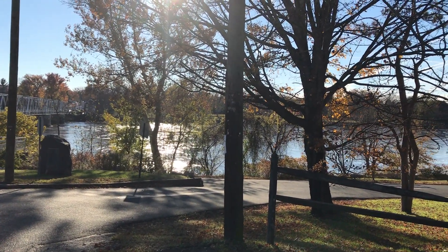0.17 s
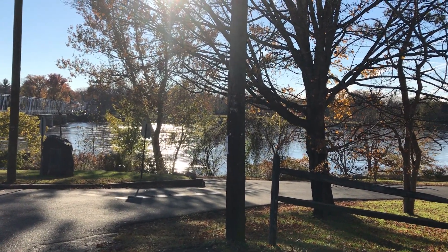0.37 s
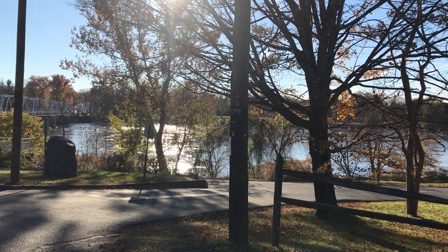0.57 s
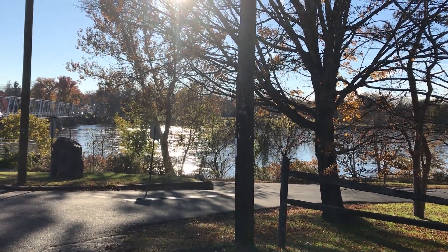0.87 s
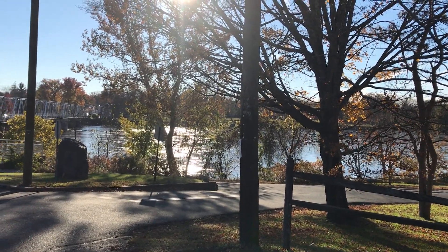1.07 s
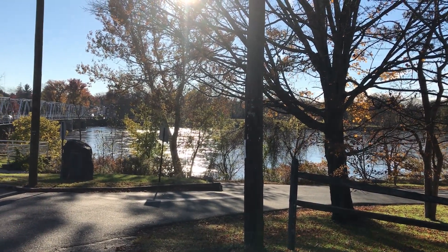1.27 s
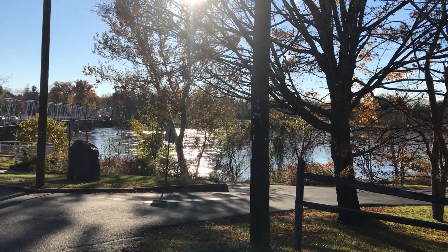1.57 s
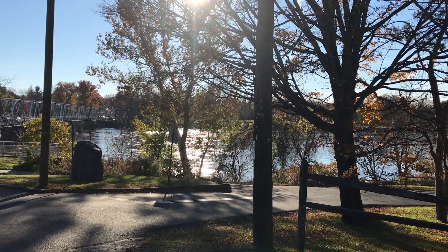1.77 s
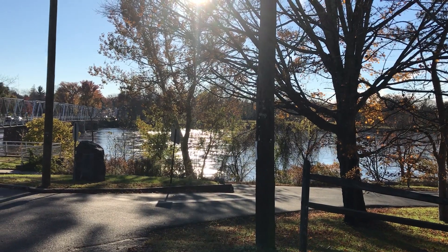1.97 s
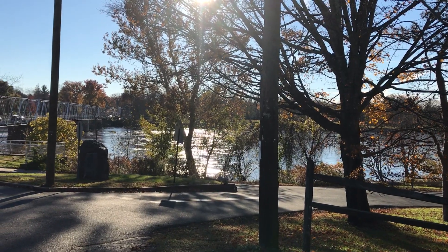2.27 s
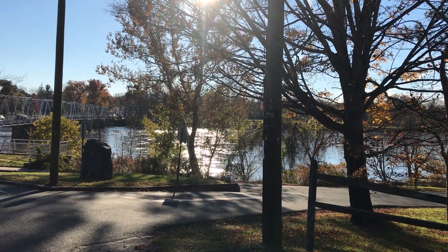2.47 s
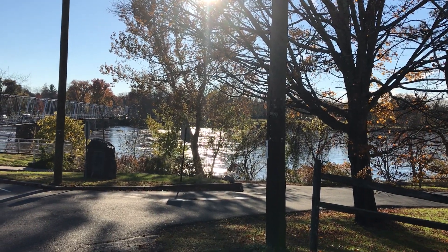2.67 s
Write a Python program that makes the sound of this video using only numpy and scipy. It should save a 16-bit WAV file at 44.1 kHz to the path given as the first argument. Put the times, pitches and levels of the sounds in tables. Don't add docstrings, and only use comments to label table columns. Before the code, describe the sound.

A big engine idles with lumpy, uneven low thumps outdoors while a car's tyre whoosh slowly swells

```python
import sys
import numpy as np
from scipy import signal
from scipy.fft import rfft, irfft
from scipy.io import wavfile
from scipy.ndimage import uniform_filter1d

SR = 44100
rng = np.random.default_rng(int(sys.argv[2]) if len(sys.argv) > 2 else 0)


def dump(signal):
    limited = np.clip(np.atleast_2d(signal).T, -1, 1)
    pcm = np.round(limited * 32767).astype(np.int16)
    wavfile.write(sys.argv[1], SR, pcm)


def ratio_of_db(decibels):
    return 10 ** (np.asarray(decibels, float) / 20)


N = 123921
T = np.arange(N) / SR
STEP_TAU = np.arange(SR // 8) / SR


def idle():
    # (time [s], level [dB])
    firings = [(0.004, -22.5), (0.146, -20.5), (0.224, -21.5), (0.286, -23), (0.361, -21), (0.5, -21.5),
               (0.572, -22.5), (0.644, -21), (0.716, -25), (0.791, -23.5), (0.866, -19.5), (0.938, -26.5),
               (1.008, -23.5), (1.083, -21), (1.293, -23), (1.365, -22), (1.439, -25.5), (1.51, -21.5),
               (1.585, -24.5), (1.742, -20.5), (1.813, -23), (1.877, -21.5), (1.947, -32), (2.096, -23),
               (2.167, -25.5), (2.242, -26.5), (2.318, -25), (2.535, -22), (2.605, -27.5), (2.756, -25.5)]
    idle_s, weak_db = 0.0725, -30
    lag_s, return_s, return_db = 0.004, 0.035, -9
    rows = list(firings)
    for (a, _), (b, _) in zip(firings, firings[1:]):
        count = int(round((b - a) / idle_s))
        rows += [(a + (b - a) * k / count, weak_db) for k in range(1, count)]
    out = np.zeros(N)
    for (at, db), luck in zip(rows, rng.standard_normal((len(rows), 8))):
        thump = exhaust_thump(luck)
        at += lag_s
        add(out, at, ratio_of_db(db) * thump)
        add(out, at + return_s * (1 + 0.08 * luck[1]), ratio_of_db(db + return_db + 2 * luck[2]) * thump)
    return out


def exhaust_thump(luck):
    # (frequency [Hz], T60 [s], level [dB])
    pipe = [(121.5, 0.03, -13), (206.6, 0.12, -9.5), (250.6, 0.18, -15), (292, 0.095, -10),
            (341.6, 0.071, -14)]
    start_hz, end_hz, sink_s = 274.7, 66.8, 0.0051
    thump_db, thump_t60_s, attack_s = 3, 0.25, 0.00247
    puff_db, puff_hz, puff_width_hz, puff_s = -22.5, 690, 715.0, 0.0075
    tau = np.arange(SR // 4) / SR
    turns = end_hz * (1 + 0.018 * luck[0]) * tau
    turns += (start_hz - end_hz) * sink_s * (1 - np.exp(-tau / sink_s))
    thump = -np.sin(2 * np.pi * turns) * ratio_of_db(thump_db - 60 * tau / thump_t60_s)
    for (hz, t60, db), chance in zip(pipe, luck[3:]):
        thump += ratio_of_db(db + 1.2 * chance) * ring(hz * (1 + 0.023 * chance), t60, tau)
    thump *= np.minimum(tau / attack_s, 1)
    puff_env = ratio_of_db(puff_db + 3.8 * luck[2]) * np.exp(-tau / puff_s)
    return thump + burst(puff_hz, puff_width_hz, puff_env)


def car_drone():
    # (time [s], pitch [Hz], level [dB])
    drone = [(1.6, 75.8, -32), (1.622, 75.76, -18.5), (1.748, 76.2, -27.5), (1.878, 92.14, -28),
             (2.0, 92.53, -30.5), (2.198, 82.97, -24.5), (2.364, 77.87, -23), (2.728, 77.5, -25),
             (2.81, 74.6, -21)]
    phase = 2 * np.pi * np.cumsum(curve(drone) * (1 + 0.0051 * walk(7.76))) / SR
    fade = np.clip((T - drone[0][0]) / 0.14, 0, 1)
    level_db = curve(drone, axis=2) + 2.5 + 0.6 * walk(6)
    return fade * ratio_of_db(level_db) * np.sin(phase)


def car_tyres():
    # (time [s], level [dB])
    whoosh = [(0, -58.5), (.8, -55.5), (1.1, -53), (1.6, -51.5), (2.0, -49.5), (2.3, -49.5), (2.6, -48),
              (2.81, -48.5)]
    # (frequency [Hz], density [dB per Hz])
    tread = [(410, -31), (700, -17.5), (777, -5.5), (1070, -4.5), (1780, -11.5), (2250, -12), (5100, -21),
             (8900, -29), (15600, -40)]
    bright_hz, brighten, near_db = 7040, 2.5, -50
    tyres = hiss(tread, slow_db=0.6, quick_db=0.8)
    top = signal.sosfiltfilt(signal.butter(1, bright_hz, "highpass", fs=SR, output="sos"), tyres)
    level_db = curve(whoosh)
    bright_top = top * ratio_of_db(brighten * (level_db - near_db))
    return ratio_of_db(level_db) * (tyres - top + bright_top)


def steps():
    # (time [s], heel level [dB], thud delay [s], scuff level [dB], scuff frequency [Hz])
    footfalls = [
        (1.1533, -24, 0.0059, -44.5, 2700),
        (1.6411, -23.5, 0.0172, -53, 4100),
    ]
    # (frequency [Hz], T60 [s], level [dB])
    heel = [(273, 0.026, 8), (480, 0.016, -10), (650, 0.015, 7), (910, 0.01, 6.5), (1230, 0.008, 3)]
    body_db, body_s = -7, 0.0059
    thud_db, thud_hz, thud_t60_s = -14.5, 112.6, 0.15
    rough_db = -11.5 - 4
    scuff_delay_s, scuff_width_s = 0.041, 0.012
    tail_db, tail_s, tail_hz = -5, 0.03, 2400
    out, tau = np.zeros(N), STEP_TAU
    for at, heel_db, delay, scuff_db, hz in footfalls:
        knock = sum(ratio_of_db(db) * ring(f, t60, tau) for f, t60, db in heel)
        add(out, at + 0.00102, ratio_of_db(heel_db) * knock * rise(0.00092))
        body_env = ratio_of_db(heel_db + body_db) * np.exp(-tau / body_s) * rise(0.001)
        add(out, at + 0.001, burst(600.0, 900.0, body_env))
        rough = burst(240.0, 300.0, ratio_of_db(rough_db) * np.exp(-tau / 0.025))
        thud = ring(thud_hz, thud_t60_s, tau) + rough
        add(out, at + delay, ratio_of_db(thud_db) * thud * rise(0.006))
        grain = ratio_of_db(1.8 * walk(1000)[:len(tau)])
        scuff_env = bump(scuff_delay_s, scuff_width_s) * grain * ratio_of_db(scuff_db)
        add(out, at, burst(hz, 2700.0, scuff_env))
        tail_env = ratio_of_db(scuff_db + tail_db) * np.exp(-tau / tail_s) * rise(0.005)
        add(out, at + scuff_delay_s, burst(tail_hz, 390.0, tail_env))
    return out


def heel_cracks():
    # (time [s], level [dB], frequency [Hz])
    cracks = [
        (1.1525, -46, 5500),
        (1.1525, -47, 6300),
        (1.153, -38, 2500),
        (1.1528, -46, 3500),
        (1.6403, -37, 2500),
        (1.6403, -37, 3200),
        (1.6403, -47, 4500),
        (1.6403, -51, 5400),
    ]
    out = np.zeros(N)
    for at, db, hz in cracks:
        add(out, at, ratio_of_db(db) * np.sin(2 * np.pi * hz * STEP_TAU) * bump(0.0014, 0.0007))
    return out


def sole_brush():
    # (time [s], width [s], level [dB], frequency [Hz])
    brushes = [
        (1.148, .011, -68, 12500),
        (1.17, .012, -50, 2200),
        (1.192, .01, -46, 1500),
        (1.194, .008, -60, 10500),
        (1.43, .015, -74, 14000),
        (1.642, .005, -66, 12500),
        (1.681, .009, -57, 10500),
        (1.685, .009, -55, 4200),
    ]
    middle_s = 1 / 16
    out = np.zeros(N)
    for at, width, db, hz in brushes:
        add(out, at - middle_s, burst(hz, 0.9 * hz, ratio_of_db(db) * bump(middle_s, width)))
    return out


def grit_ticks():
    # (time [s], level [dB], frequency [Hz])
    ticks = [(.998, -57, 6500), (.998, -62, 12000), (1.312, -59, 10000), (1.545, -62, 13000),
             (1.905, -55, 11500), (2.185, -60, 13500), (2.66, -57, 10000)]
    out = np.zeros(N)
    for at, db, hz in ticks:
        add(out, at, burst(hz, 0.47 * hz, ratio_of_db(db) * np.exp(-STEP_TAU / 0.0014)))
    return out


def grit_crunch():
    # (time [s], level [dB], frequency [Hz])
    crunches = [(.216, -38, 800), (.248, -39, 800), (.618, -41, 1700), (.677, -38, 750), (.91, -41, 1300),
                (1.084, -40, 700), (1.384, -43, 1300), (1.502, -37, 750), (1.565, -39, 750)]
    out = np.zeros(N)
    for at, db, hz in crunches:
        add(out, at, burst(hz, 0.6 * hz, ratio_of_db(db) * np.exp(-STEP_TAU / 0.005) * rise(0.001)))
    return out


def bird():
    # (time [s], length [s], frequency [Hz], level [dB])
    peeps = [(0.386, .06, 5800, -65), (0.625, .035, 5930, -64), (0.898, 0.044, 5100, -64),
             (.93, .12, 4900, -64), (1.045, 0.023, 5930, -65), (1.224, 0.017, 11700, -64),
             (1.515, .025, 5750, -58), (1.534, .02, 5800, -64), (1.978, .035, 5800, -53),
             (2.144, 0.034, 5940, -62), (2.315, 0.03, 5800, -57)]
    out = np.zeros(N)
    for at, length, hz, db in peeps:
        add(out, at, burst(hz, 0.07 * hz, ratio_of_db(db - 3) * np.hanning(int(length * SR))))
    return out


def distant_traffic():
    # (time [s], level [dB])
    swell = [(0, -32.5), (.25, -31), (.6, -31), (.95, -30), (1.3, -30.5), (1.7, -33), (2.1, -33.5),
             (2.81, -33.5)]
    # (frequency [Hz], density [dB per Hz])
    rumble = [(15, -51), (25, -12.5), (59, -3.5), (89, -5.5), (290, -21), (483, -28.5), (1210, -34),
              (2300, -46.5), (15600, -73)]
    return ratio_of_db(curve(swell)) * hiss(rumble, slow_db=0.6, quick_db=1.0)


def walk(rate):
    k = int(SR / rate)
    held = np.repeat(rng.standard_normal(N // k + 1), k)
    return 0.9 * uniform_filter1d(uniform_filter1d(held, k), k)[:N]


def curve(table, axis=1):
    return np.interp(T, np.array(table)[:, 0], np.array(table)[:, axis])


def hiss(shape, slow_db, quick_db):
    f = np.maximum(np.fft.rfftfreq(N, 1 / SR), 1)
    hz, db = np.transpose(shape)
    spec = rfft(rng.standard_normal(N)) * ratio_of_db(np.interp(np.log(f), np.log(hz), db))
    out, shared = 0, walk(14)
    for octave in range(5, 15):
        share = np.clip(1 - abs(np.log2(f) - octave), 0, 1)
        out = out + irfft(spec * share, N) * ratio_of_db(slow_db * shared + quick_db * walk(20))
    return out / np.std(out)


def burst(hz, width, env):
    edges = np.clip([hz - width / 2, hz + width / 2], 50, 0.45 * SR)
    band = signal.butter(2, edges, "bandpass", fs=SR, output="sos")
    noise = signal.sosfilt(band, rng.standard_normal(len(env)))
    return noise / np.std(noise) * env


def ring(hz, t60, tau):
    return np.sin(2 * np.pi * hz * tau) * ratio_of_db(-60 * tau / t60)


def rise(seconds):
    return np.minimum(STEP_TAU / seconds, 1)


def bump(middle, width):
    return np.exp(-0.5 * ((STEP_TAU - middle) / width) ** 2)


def add(out, at, sound):
    i = int(at * SR)
    out[i:i + len(sound)] += sound[:N - i]


def scene():
    car = car_drone() + car_tyres()
    feet = steps() + heel_cracks() + sole_brush() + grit_ticks() + grit_crunch()
    return (idle() + car + feet + bird() + distant_traffic())[None]


def band_limit(x):
    return signal.sosfilt(signal.butter(12, 15700, fs=SR, output="sos"), x)


def record(dry):
    # (frequency [Hz], width [Hz], level [dB])
    dips = [(4910, 460, -4), (7800, 150, -2), (10400, 154, -3)]
    low_hz, top_hz = 36.7, 15750
    x = signal.sosfilt(signal.butter(2, low_hz, "highpass", fs=SR, output="sos"), dry)
    for hz, width, db in dips:
        peak = signal.lfilter(*signal.iirpeak(hz, hz / (2 * width), fs=SR), x)
        x = x - (1 - ratio_of_db(db)) * peak
    mix = signal.sosfilt(signal.ellip(10, 0.2, 80, top_hz, fs=SR, output="sos"), x)
    return band_limit(mix)


dry = scene()
out = record(dry)
dump(out)
```